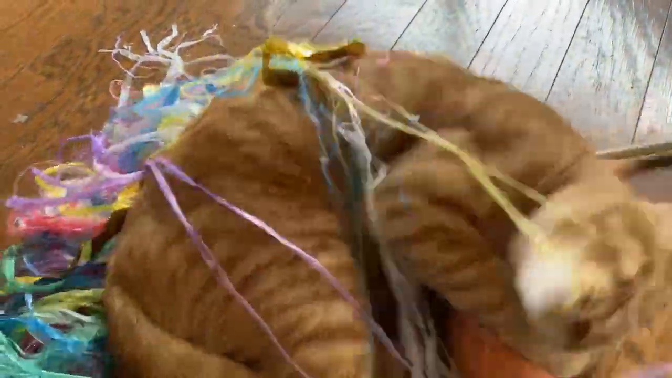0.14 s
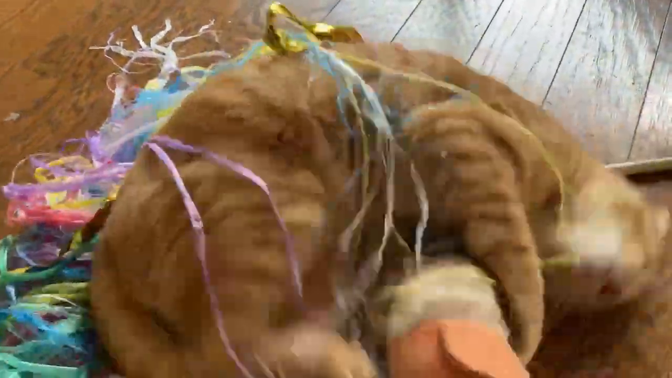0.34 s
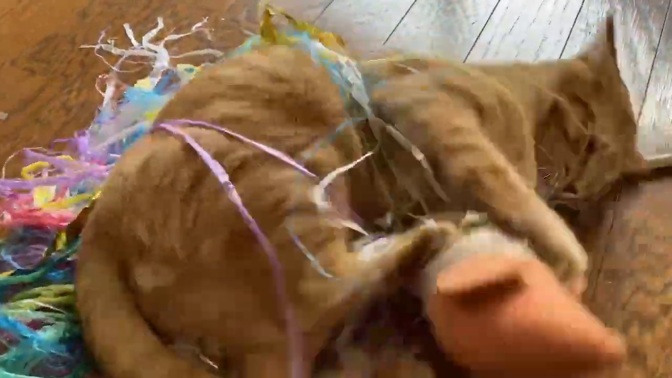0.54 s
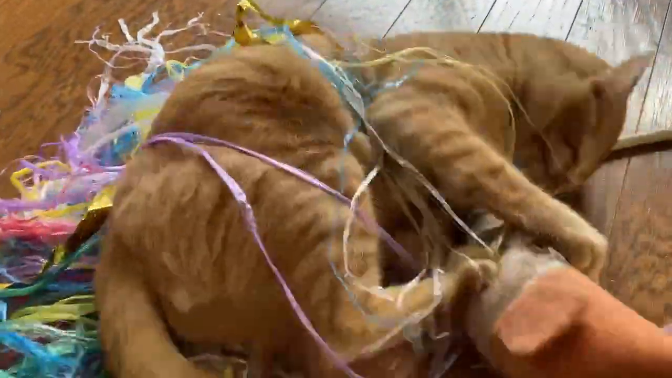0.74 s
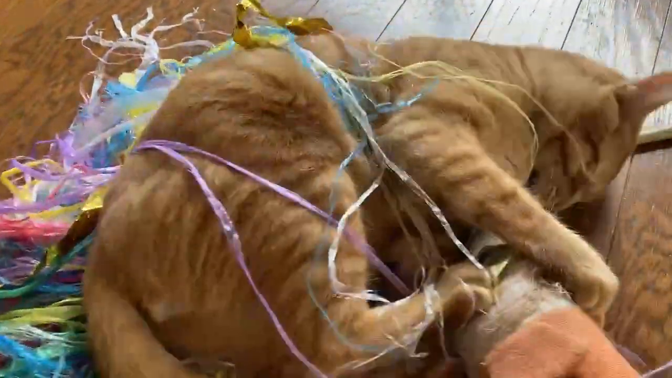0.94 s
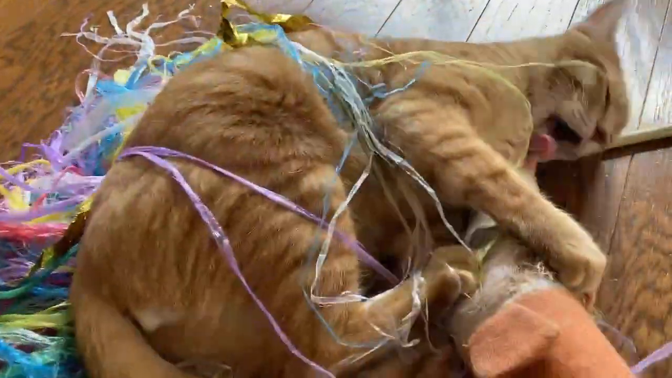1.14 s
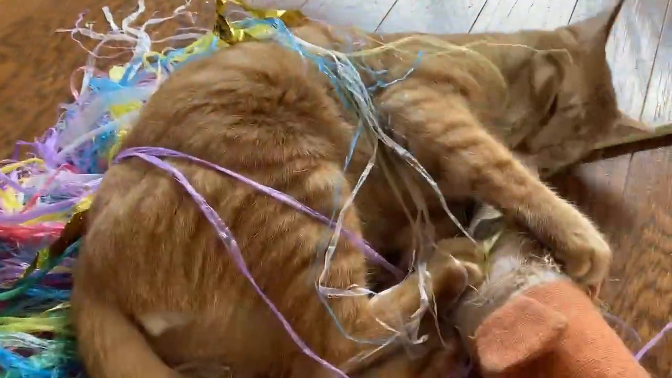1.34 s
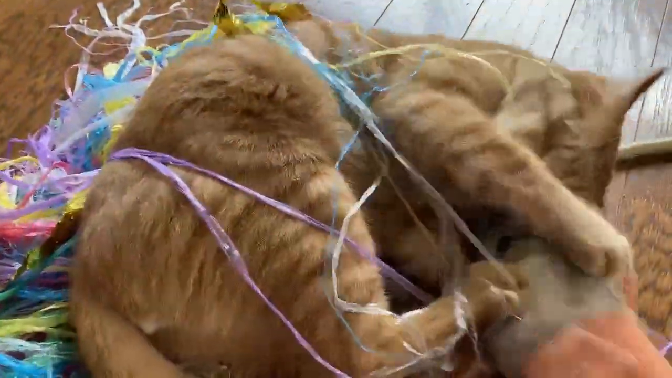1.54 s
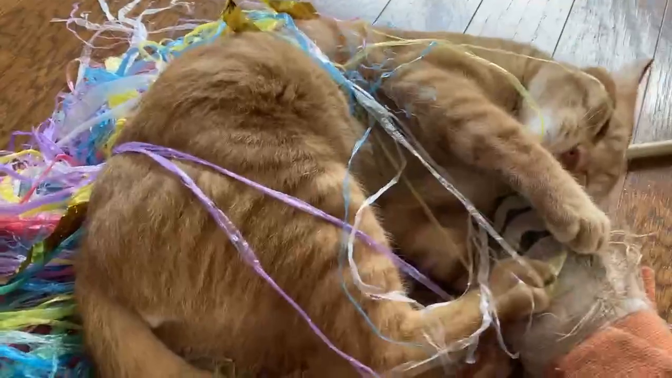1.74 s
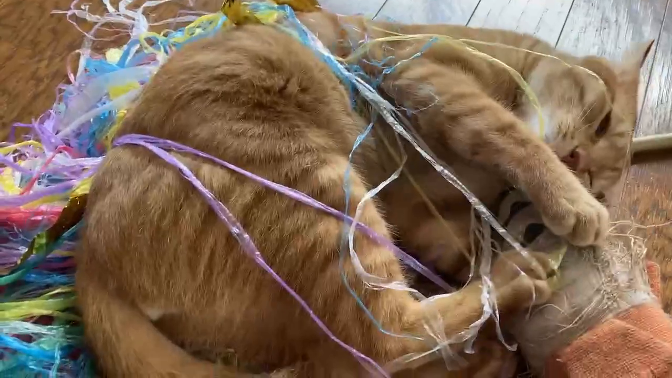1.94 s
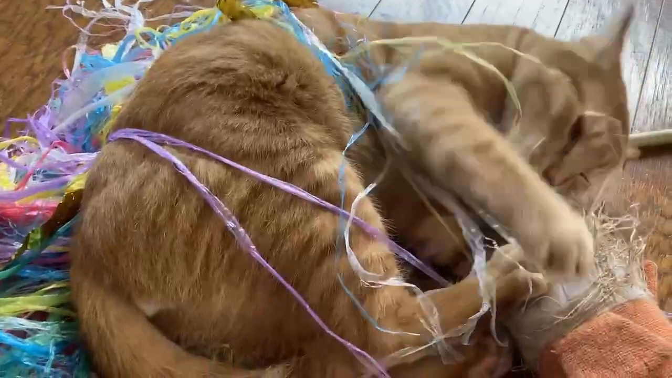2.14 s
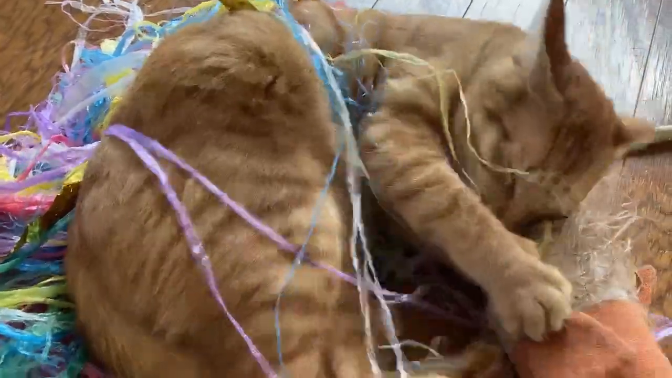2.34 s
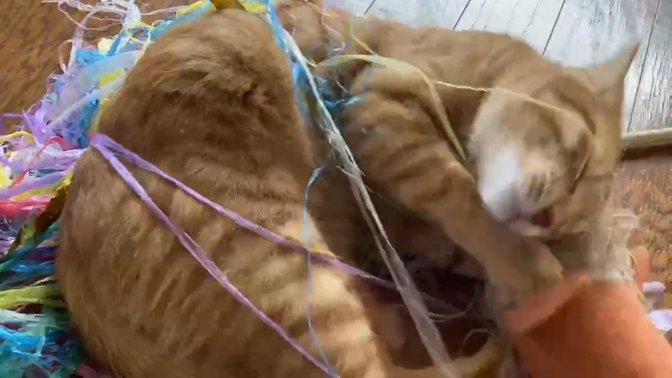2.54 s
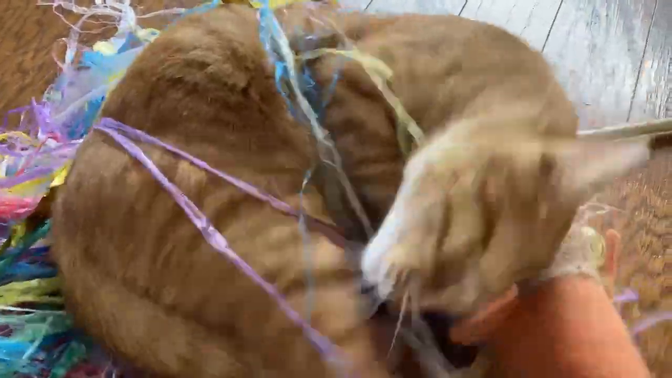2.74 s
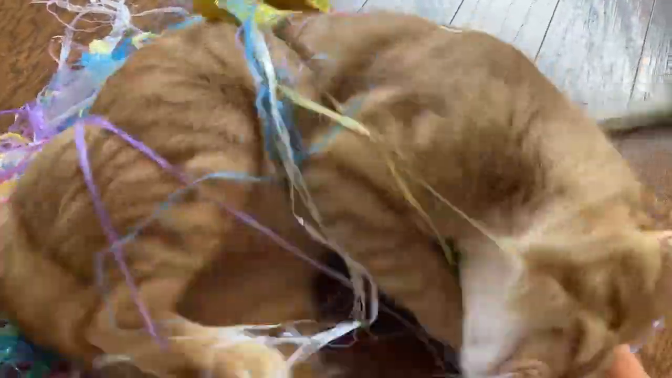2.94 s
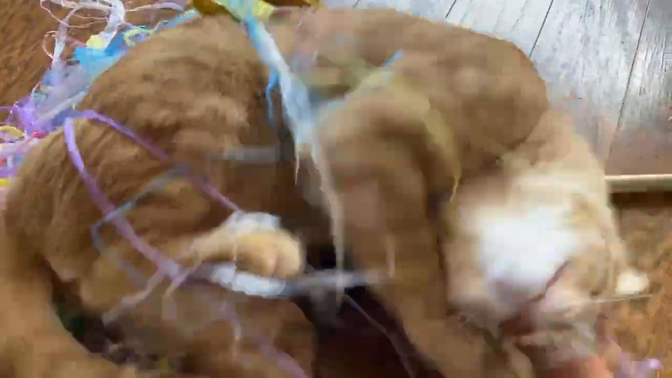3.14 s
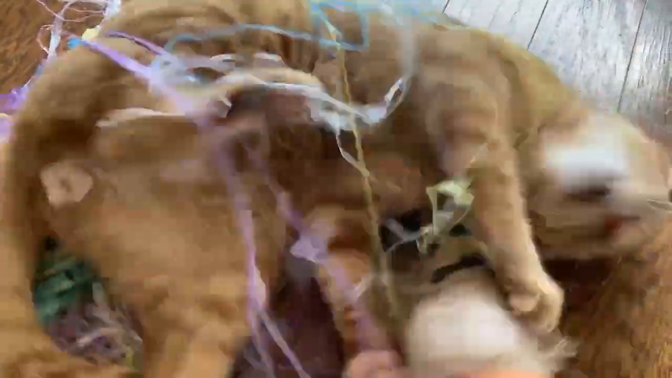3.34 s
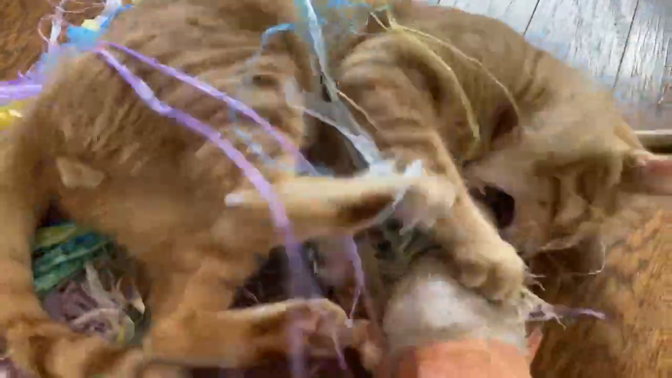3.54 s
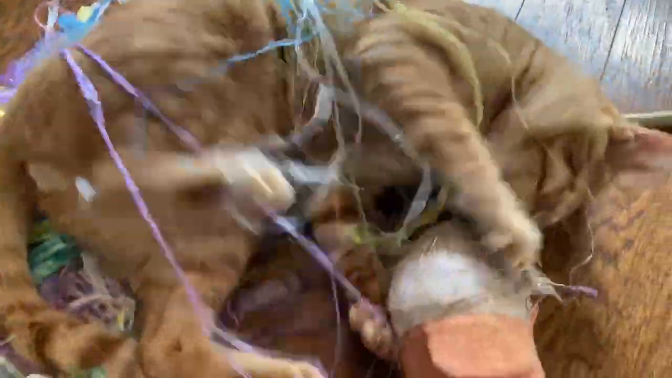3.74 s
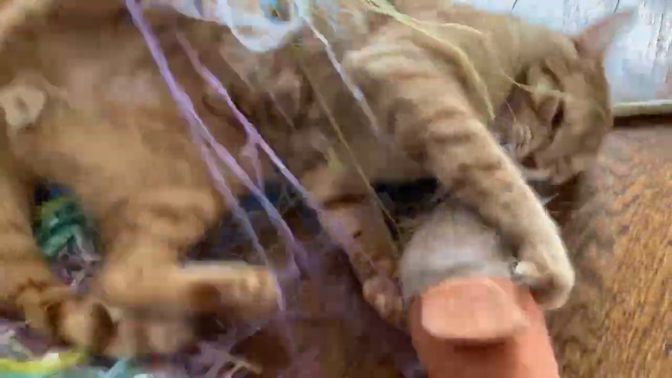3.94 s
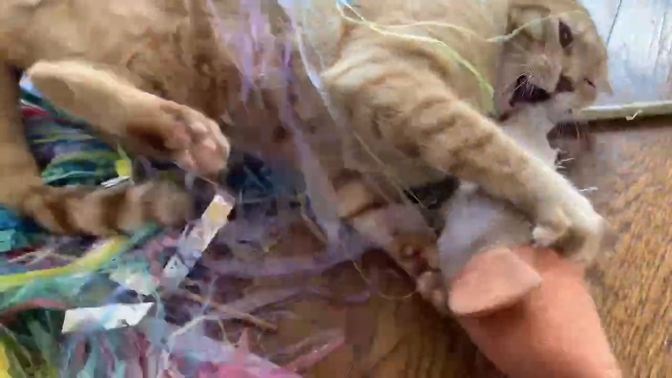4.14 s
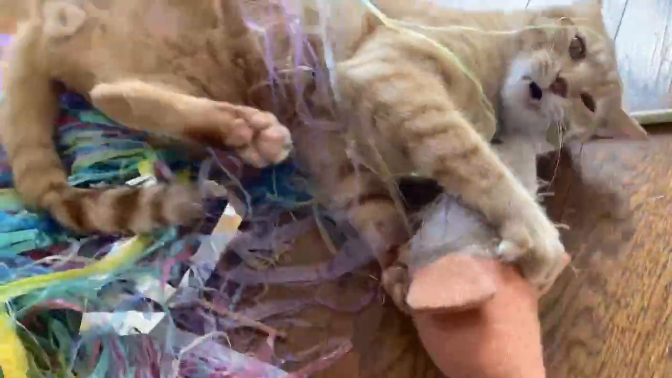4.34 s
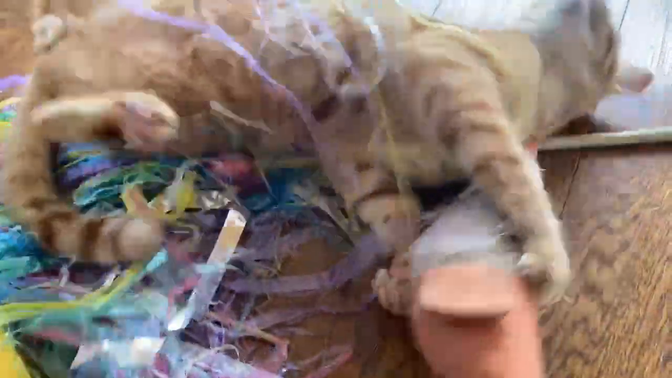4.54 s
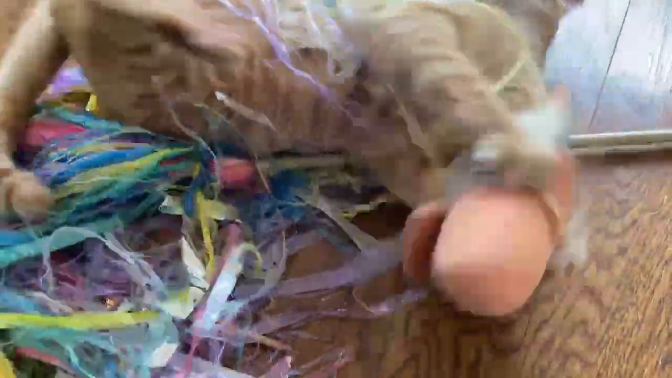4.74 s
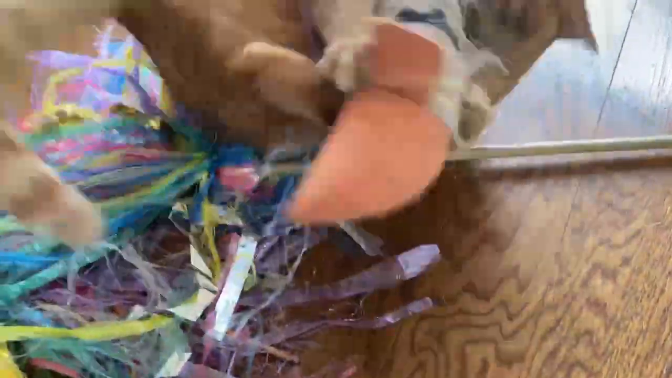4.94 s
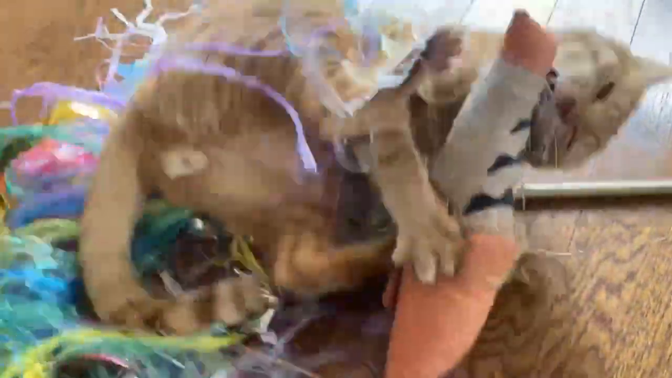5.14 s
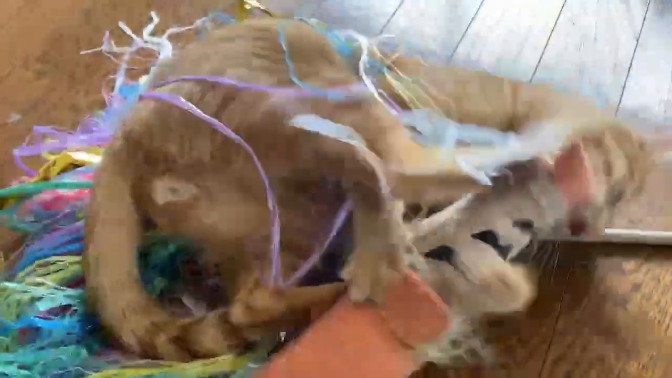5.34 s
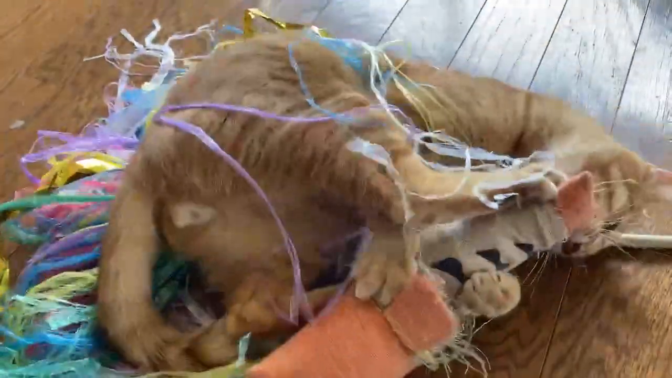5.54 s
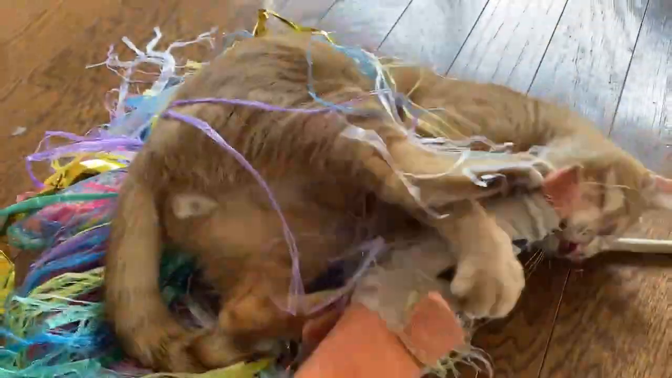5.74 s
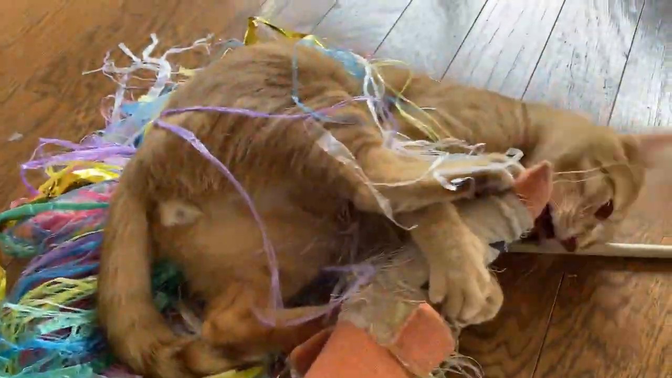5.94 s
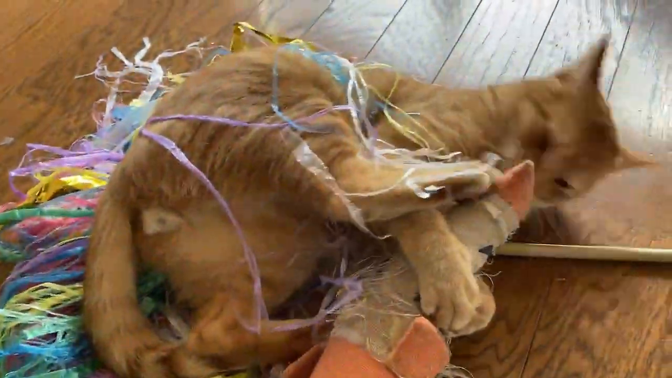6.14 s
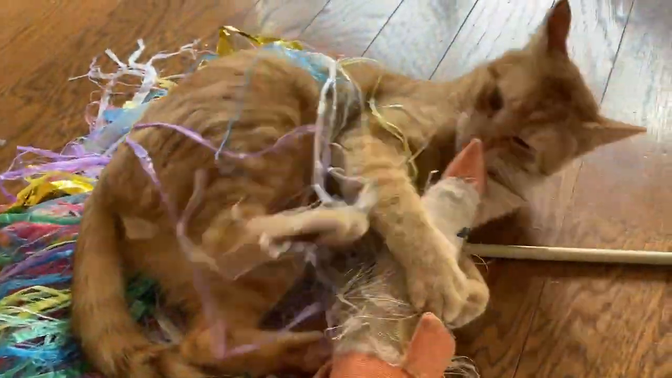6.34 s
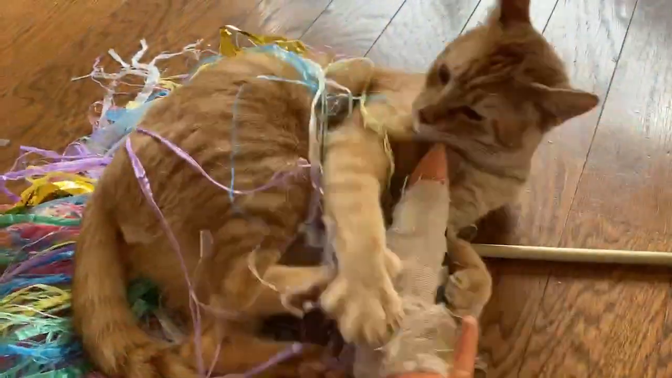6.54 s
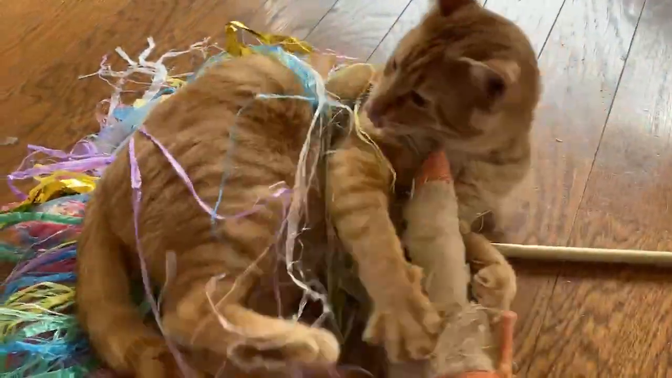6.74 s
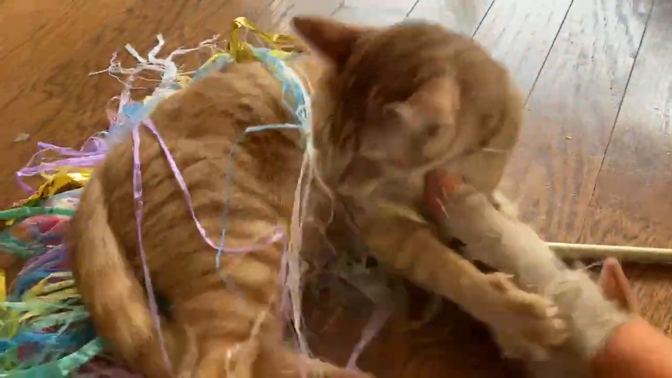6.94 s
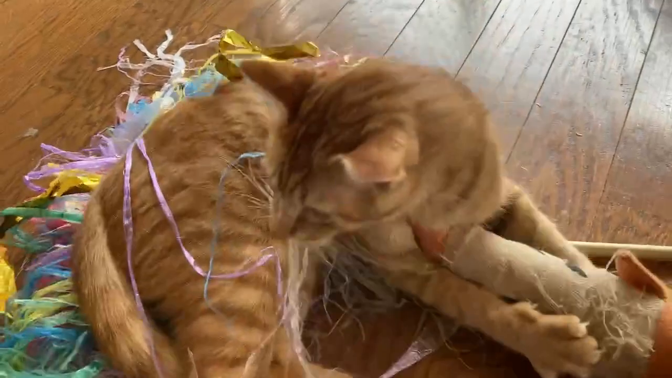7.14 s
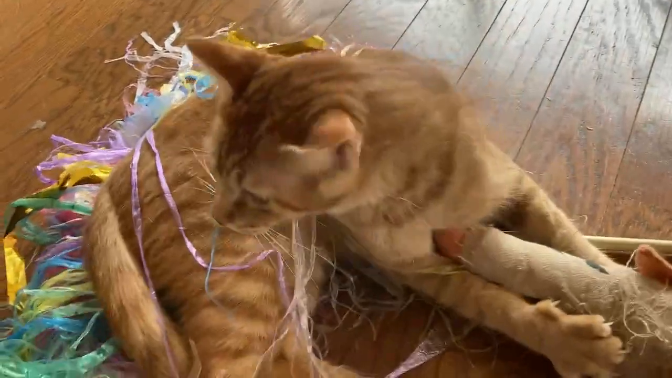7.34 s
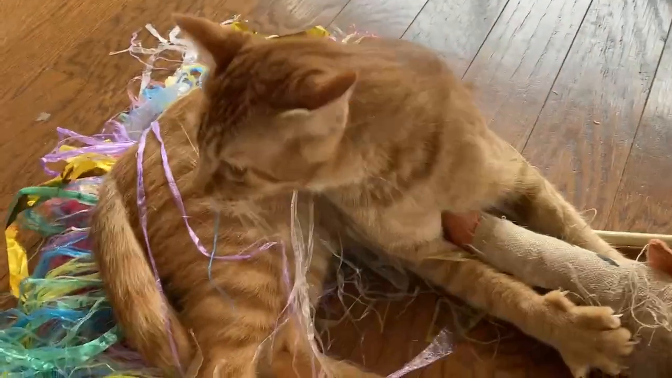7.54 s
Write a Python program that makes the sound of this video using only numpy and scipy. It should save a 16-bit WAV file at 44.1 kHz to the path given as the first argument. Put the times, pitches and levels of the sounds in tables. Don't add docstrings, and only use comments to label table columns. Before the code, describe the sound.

A cat wrestles a cloth toy in loose ribbon: crisp bright rustling, crackling flurries, faint collar jingle, claws and a stick tapping bare boards.

```python
import sys
import numpy as np
from scipy import signal
from scipy.fft import rfft, irfft
from scipy.io import wavfile
from scipy.ndimage import uniform_filter1d

SR = 44100
rng = np.random.default_rng(int(sys.argv[2]) if len(sys.argv) > 2 else 0)


def natural_amplitude(level_db):
    exponent = np.asarray(level_db, float) / 20
    return 10 ** exponent


def store_pcm(level_fs):
    pcm = np.round(np.clip(level_fs, -1, 1) * 32767).astype(np.int16)
    wavfile.write(sys.argv[1], SR, np.atleast_2d(pcm).T)


N = 338688
T = np.arange(N) / SR
HZ = np.fft.rfftfreq(N, 1 / SR)

# fullest moment in seconds, level in dB, rise and fall over 20 dB in seconds.
STIRS = [(.09, -48, 0.26, 0.18), (.235, -36.5, 0.14, 0.092), (.33, -44.5, 0.085, 0.18),
         (.445, -46.5, 0.088, 0.35), (.66, -47, 0.31, 0.36), (1.15, -61, 1.9, 1), (1.48, -54.5, 0.13, 0.36),
         (1.6, -54.5, 0.43, 0.28), (1.72, -64, 0.45, 0.3), (2.05, -61, 0.14, 0.055),
         (2.25, -48.5, 0.077, 0.35), (2.5, -43, 0.087, 0.3), (2.85, -48, 0.3, 0.36),
         (2.975, -42, 0.22, 0.26), (3.175, -42.5, 0.11, 0.31), (3.385, -42.5, 0.29, 0.19),
         (3.72, -53.5, 1.3, 0.46), (4.05, -42.5, 0.49, 0.42), (4.4, -60.5, 1, 1), (4.68, -46, 0.66, 0.33),
         (4.95, -43, 0.28, 0.17), (5.085, -36, 0.065, 0.14), (5.33, -38.5, 0.32, 0.16), (5.6, -54, 0.32, 1),
         (5.8, -59, 0.18, 0.093), (6.19, -49, 0.075, 0.13), (6.57, -57.5, 0.4, 0.96),
         (6.98, -52.5, 0.33, 0.76), (7.12, -52, 0.56, 0.14), (7.42, -60, 0.12, 0.23)]
# fullest moment in seconds, scrape in dB, rumble in dB, length within 20 dB in seconds.
SHOVES = [(0.056, -51.5, -61, 0.15), (0.22, -48, -63, 0.22), (0.312, -83, -67.5, 0.5),
          (0.442, -61, -55, 0.02), (1.092, -62.5, -66.5, 0.56), (1.255, -60, -65, 0.5),
          (1.404, -60.5, -67, .5), (1.535, -58, -58.5, 0.3), (1.856, -60.5, -74, 0.17),
          (2.052, -59.5, -62, 0.25), (2.248, -52.5, -62, 0.2), (2.554, -55.5, -62, 0.48),
          (2.638, -47.5, -57, 0.16), (2.858, -48, -59.5, 0.13), (3.011, -45, -67, 0.2),
          (3.124, -74, -64.5, 0.3), (3.325, -82, -70, 1), (3.482, -54.5, -57.5, 0.17),
          (4.06, -53, -66, 0.44), (4.582, -58.5, -79, 0.3), (4.728, -58.5, -64.5, 0.22),
          (4.919, -50, -62.5, 0.24), (5.005, -67, -39, 0.0268), (5.122, -60, -59, 0),
          (5.381, -56, -64.5, 0.19), (6.204, -57, -75, 0.18), (6.592, -64, -74, 1.65),
          (6.898, -57.5, -65, 0.4), (7.207, -59.5, -69.5, 0.5), (7.531, -53.5, -63.5, 0.4)]
# low and high edge in Hz, place between controls (0 rumble, 1 scrape,
# 2 low hiss, 3 top hiss), level in dB, share of cracks (0-1), share unlike between channels (0-1).
RUSTLE_BANDS = [(29.8, 90, 0., -3.5, 0.031, 0.0017), (92.7, 188.8, 0., -1.5, 0.11, 0.00055),
                (200.7, 406, 0.52, -6, 0.22, 0.00087), (414, 1064, 1.3927, -5, 0.39, 0.0032),
                (1055, 2240, 1.5, -3, 0.32, 0.4), (2214, 2860, 1.27, -6, 0.25, 0.41),
                (2870, 4090, 1.75, -3, 0.29, 0.48), (4030, 6330, 2, -0.5, 0.29, 0.55),
                (6380, 7930, 2., -0.8, 0.61, 0.026), (8097, 10390, 3., -2, 0.28, 0.0036),
                (10500, 12800, 3., -4, 0.43, 0.015), (12900, 15600, 3., -6.5, 0.23, 0.025)]
# start in seconds, peak in dB, ring in Hz, body below 8 kHz in dB.
SNAPS = [(.1796, -15, 8850, 0), (.235, -16, 10800, -8), (.261, -16.5, 9600, -6), (.6881, -29, 12600, -3),
         (1.122, -30, 10100, -2.5), (2.2325, -17.5, 8500, -0.5), (2.2414, -15.5, 8900, 1),
         (2.4295, -17, 8000, 2.2), (2.4513, -29, 8000, 1.5), (2.4724, -23.5, 9900, -0.5),
         (2.5273, -19, 8900, -1), (2.5343, -14.5, 10900, -5), (2.5451, -21.5, 10100, 1),
         (2.6216, -20, 7000, -2.3), (3.0342, -19, 10200, -10), (3.1887, -17, 9000, -7),
         (3.2216, -16, 11000, -3), (3.2335, -18, 9000, -4), (3.366, -15, 10900, 0),
         (4.4488, -20.5, 10500, -1.5), (4.7826, -22, 10000, -2), (4.8417, -22, 10500, 2.5),
         (4.9373, -17.5, 10300, -5.5), (5.0187, -22.5, 12300, -1), (5.0561, -20, 12200, -8),
         (5.2284, -18.5, 9400, -8.5), (5.2635, -15, 10100, 2.5), (5.695, -26, 14200, -7),
         (6.83, -28.5, 7900, -3), (7.3102, -31.5, 7500, 0.5)]
# start in seconds, peak in dB.
MORE_SNAPS = [(0.2574, -16), (0.3253, -22), (0.4226, -28), (0.852, -28), (1.0406, -36.5), (1.092, -32),
              (1.5917, -33), (2.237, -22), (2.415, -34), (2.9205, -25), (3.017, -25), (3.1705, -22),
              (3.388, -19), (5.278, -24), (5.34, -20), (5.506, -30.5), (5.601, -32.5), (5.647, -25.5),
              (5.7701, -28.5), (5.8069, -27.5), (5.829, -27), (5.9267, -28), (6.08, -39.5), (6.144, -31.5),
              (7.597, -40), (.72, -31.5), (1.5683, -34.5), (2.484, -30), (2.493, -33), (2.5176, -26),
              (3.1295, -30), (3.1577, -22), (3.181, -27), (3.205, -30), (3.2165, -23), (3.241, -25),
              (3.374, -30), (5.039, -27), (5.089, -25), (6.367, -51), (6.517, -39)]
# start in seconds, low modes in dB,
# second pair of modes against them in dB, top modes in dB.
JINGLES = [(.0094, -46, -1, -59), (.3254, -39.5, -1, -38), (0.423, -48, -2, -38), (0.4475, -45, -2, -39),
           (.458, -41.5, 0, -47), (0.613, -45, -1, -51), (0.6875, -36.5, 0, -38), (1.69, -55.5, 1, -65),
           (1.7725, -56.5, -8, -60), (1.79, -52, -1, -60), (2.38, -44, -8, -67),
           (2.6507, -43.5, -14, -85.5), (3.3394, -54, -1, -43), (3.403, -31, -4, -38.5),
           (3.453, -31.5, -4, -46), (3.487, -41.5, -8, -58), (3.6443, -49, -2, -42.5),
           (4.7249, -35, -17, -59), (4.7472, -37.5, -1.5, -61), (4.7584, -34, -6, -57),
           (4.782, -39.5, -11, -59.5), (4.826, -36, -11, -58), (4.889, -39, -10, -64),
           (4.912, -43, -3, -62), (4.9488, -39, -11, -47), (4.974, -37, -3, -48), (4.982, -32, -10, -50),
           (4.993, -32, -2, -41), (6.701, -55.5, -7, -64), (6.984, -50.5, -4, -57), (6.998, -44, -3.5, -61),
           (7.062, -38, -3.5, -58), (7.075, -38, -12, -64), (6.785, -55.5, -15, -67),
           (7.262, -58, -14, -71)]
# pitch in Hz, level in dB, 60 dB decay in seconds.
BELL_MODES = [(5070, -4, 0.049), (5300, 1.5, 0.14), (5920, 8, 0.072), (6400, -14, 0.026),
              (12600, 1.5, 0.058), (13450, -6, 0.037)]
# start in seconds, peak in dB, ring in Hz.
KNOCKS = [(.423, -42.5, 600), (0.62, -45, 2890), (.869, -47.5, 646), (.935, -49, 587), (1.22, -41.5, 2980),
          (1.442, -38.5, 520), (1.536, -39, 955), (2.297, -43, 4580), (2.666, -34, 848), (2.774, -41, 534),
          (3.451, -32, 887), (3.656, -60.5, 1340), (4.0088, -38, 1190), (4.055, -24, 1603),
          (4.061, -23.5, 792), (4.073, -31.5, 710), (4.159, -47, 1170), (4.617, -42, 2700),
          (4.653, -41.5, 2160), (4.796, -42.5, 1220), (4.8625, -27.5, 1680), (4.873, -34.5, 1510),
          (4.948, -30, 3720), (5.624, -55.5, 1055), (5.765, -49.5, 680), (6.175, -37, 1805),
          (6.225, -41.5, 2470), (6.539, -45, 790), (6.608, -48.5, 1410), (6.856, -46, 2320),
          (6.926, -44, 1845)]
# start in seconds, peak in dB, ring in Hz.
THUMPS = [
    (1.046, -55, 306),
    (2.041, -54.5, 294),
    (3.306, -52, 127),
    (3.321, -56, 83.4),
    (4.997, -42, 118),
    (5.096, -53, 90),
]
# start in seconds, peak in dB, ring in Hz.
CLAWS = [(0.62, -46, 2860), (0.905, -49, 2400), (0.9516, -46, 3575), (0.9911, -46, 4550),
         (1.0251, -45, 6810), (1.066, -46.5, 4340), (1.1004, -36.5, 4440), (1.2221, -35.5, 2900),
         (1.4416, -35, 2430), (1.5559, -34, 1580), (1.6886, -50, 5030), (1.937, -51, 4160),
         (1.9989, -54, 7040), (2.1789, -48, 7090), (2.7292, -46, 4030), (2.813, -41, 4440),
         (2.8394, -42, 2050), (3.839, -40, 7290), (4.0089, -23, 2880), (4.0542, -22, 1940),
         (4.545, -34, 6020), (4.574, -36, 7050), (4.5885, -30.5, 6000), (4.6533, -32, 7040),
         (4.7596, -26, 5310), (4.8623, -30, 1740), (4.9038, -32, 6720), (5.3457, -52, 2270),
         (5.3592, -42, 1770), (5.9998, -56, 7220), (6.148, -39.5, 4500), (6.1514, -32.5, 4390),
         (6.1664, -39, 6840), (6.1764, -40.5, 1770), (6.2242, -39, 2440), (6.6074, -53, 2160),
         (6.9269, -35.5, 2150), (7.0254, -36, 6960)]
# fullest moment in seconds,
# length within 20 dB in seconds, level in dB, resonance in Hz, its width in Hz.
SCUFFS = [(0.073, 0.04, -48, 1750, 110), (0.062, 0.06, -53, 2360, 110), (2.995, 0.13, -54, 3000, 500),
          (.047, .025, -50, 540, 150), (2.975, .16, -58, 4300, 500), (.098, .04, -54, 1800, 110),
          (2.865, .12, -51, 950, 120), (0.2, .12, -53, 750, 350), (0.247, 0.08, -60, 2400, 900),
          (0.915, 0.2, -63.5, 320, 120), (1.051, .07, -58.5, 338, 151), (1.09, 0.14, -57, 380, 120),
          (1.088, 0.3, -64, 940, 90), (1.49, 0.2, -59, 862, 50), (1.53, .05, -58, 1900, 300),
          (1.537, 0.07, -57, 1000, 120), (1.56, -0.11, -47, 1550, 600), (2.835, .06, -54.5, 1060, 90),
          (2.857, 0.3, -57.5, 1900, 200), (2.878, 0.02, -50.5, 1020, 60), (3.005, .1, -54, 2000, 350),
          (3.01, -0.02, -50, 1750, 200), (3.06, 0.15, -56, 860, 50), (7.528, .15, -65.5, 1300, 500),
          (4.052, 0.09, -42.5, 3000, 1200), (4.764, 0.1, -45.5, 6400, 1500), (5.101, -0.03, -57, 2020, 400),
          (5.122, 0.08, -61.5, 950, 450), (5.134, 0.15, -63, 108, 60), (5.366, 0.01, -47, 1800, 900),
          (5.374, 0.16, -62, 620, 300), (6.88, -0.2, -59, 200, 150), (6.91, -0.02, -57, 640, 200),
          (2.05, 0.1, -58, 290, 200), (7.142, .03, -56, 1100, 500), (7.17, 0.17, -59, 1240, 300),
          (7.222, 0.2, -66.5, 1400, 248)]
# fullest moment in seconds, level in dB, rise and fall over 20 dB in seconds.
DRAGS = [
    (.125, -64, 0.033, 0.06),
    (.706, -68, 0.12, 0.068),
    (1.552, -56, 0.09, 0.042),
    (2.868, -50.5, 0.061, 0.089),
    (3.06, -60, 0.12, 0.12),
]
# pitch in Hz, width in Hz, level in dB.
STICK_MODES = [(885.6, 30, 1), (1003, 16, -7), (1800, 440, -6), (2330, 16, -19)]
# start in seconds, peak in dB, ring in Hz, 60 dB decay in seconds.
TAPS = [(.047, -30.5, 915, .06), (.0715, -32, 905, .055), (.092, -33.5, 885, .045), (.109, -45, 890, .05),
        (.122, -47, 885, .08), (.05, -44, 2330, .06), (.068, -42, 2390, .045), (.196, -41, 1760, .045),
        (.222, -42, 1770, .06), (1.532, -48, 870, .12), (2.866, -46, 1030, .07), (2.902, -42, 880, .04),
        (3.013, -48, 865, .1), (3.041, -47, 865, .12), (3.086, -45, 700, .012), (4.056, -34, 732, .07),
        (4.057, -37, 1935, .04), (6.539, -50, 900, .015), (6.6075, -40, 2200, .008),
        (6.928, -42, 2000, .006)]
# from and to in seconds, depth at start and at end in dB.
DUCKS = [(0, 0.063, -4, 4.4), (0.092, 0.177, 11, 32), (0.188, 0.27, 17, 19.5), (0.274, .32, 27.5, 20),
         (0.32, 0.99, 21, 14.6), (1.594, 1.693, 15, 14.7), (2.698, 2.934, 19.5, 14), (2.936, 3.017, 26, 21),
         (3.02, 3.238, 18, 23.7), (3.256, 3.43, 26.5, 36), (3.529, 3.829, 24.5, 25.8),
         (3.82, 4.149, 7, 13.3), (4.171, 4.448, 16.5, 16.6), (4.446, 4.533, 12, 9.4),
         (5.012, 5.347, 18.5, 35), (5.342, 5.753, 21.5, 25.4), (5.747, 5.986, 13, 14.3),
         (6.255, 6.44, 7, 4.9), (6.434, 6.795, 11, 5.5), (7.026, 7.294, 8, 6.8)]
# pitch in Hz, lead in radians.
PHASE_TURN = [(0, 0), (6400, 0), (7200, 0), (9100, -np.pi), (11300, -2 * np.pi), (13650, -3 * np.pi),
              (15600, -4 * np.pi)]

DUCK_REST_DB, DUCK_EDGE_S = 5, .02
SNAP_DUCK, BELL_DUCK = 1.09, .79
REST_RIBBON_DB, REST_SCRAPE_DB, REST_RUMBLE_DB = -82.5, -76.5, -75.5
SHOVE_RISE_SHARE, SCUFF_RISE_SHARE = .49, .34
MORE_SNAP_HZ, MORE_SNAP_BODY_DB = 10800, -2.5
KNOCK_T60_S, KNOCK_LAG_S = .022, .00004
CLAW_Q, CLAW_TAIL, CLAW_TAIL_S = 1.2, .1, .0015
TAP_RISE_S = .006
HUM_HZ, HUM_DB = 118.6, -75
ROOM_T60_S, ROOM_DB = .2, -18
BELL_TURN_RAD = 1.99
SETTLE_RAD, SETTLE_SWING_RAD, NOTCH_DRIFT = .92, .28, .005
PATCH_LOW_DB, PATCH_TOP_DB = 3, 2


def rustle():
    lead = controls()
    cracks = grains(1800, 6.7)
    bunching = 1.83 * walk(45)
    alike, unlike = 0, 0
    for lo, hi, place, db, grain, loose in RUSTLE_BANDS:
        k = int(place)
        grain, loose = np.clip(grain, 0, 1), np.clip(loose, 0, 1)
        lead_db = lead[k] + (place - k) * (lead[k + 1] - lead[k])
        gain = natural_amplitude(lead_db + db + grain * 2 * bunching + 1.42 * walk(25))
        crackle = unit(band(cracks * natural_amplitude(2.7 * rng.standard_normal(N)), lo, hi))
        hiss, other_hiss = (unit(band(rng.standard_normal(N), lo, hi)) for _ in range(2))
        blend = np.sqrt(grain) * crackle + np.sqrt(1 - grain) * hiss
        alike = alike + gain * blend * np.sqrt(1 - loose)
        unlike = unlike + gain * np.sqrt(loose) * other_hiss
    return alike, unlike


def controls():
    s, scrape_db, rumble_db, length = np.transpose(SHOVES)
    rise, fall = SHOVE_RISE_SHARE * length, (1 - SHOVE_RISE_SHARE) * length
    rumble = swells(zip(s, rumble_db, 1.23 * rise, 1.2 * fall), REST_RUMBLE_DB)
    rumble = rumble + 1.5 - .14 * ducking(T)
    scrape = swells(zip(s, scrape_db, rise, fall), REST_SCRAPE_DB)
    top = swells(STIRS, REST_RIBBON_DB)
    return rumble, scrape, top - ducking(T), top, top


def snaps():
    top, low = np.zeros(N), np.zeros(N)
    creases = list(SNAPS) + [(s, db, MORE_SNAP_HZ, MORE_SNAP_BODY_DB) for s, db in MORE_SNAPS]
    fizz = rng.standard_normal((len(creases), 400))
    fizz = fizz * abs(fizz) * np.exp(-T[:400] / .0021)
    for (s, db, hz, body_db), tail in zip(creases, fizz):
        crack = .12 * tail
        crack[:40] *= np.linspace(.2, 1.2, num=40)
        crack[40] += 1
        strip = signal.lfilter(*signal.iirpeak(hz, 2.2, fs=SR), crack)
        add(top, s - 40 / SR, natural_amplitude(db + 10) * (strip + .22 * crack))
        add(low, s - 40 / SR, natural_amplitude(db + body_db - SNAP_DUCK * ducking(s) + 14.5) * crack)
    low = signal.lfilter(*signal.butter(2, 4600, "high", fs=SR), low) + .07 * low
    air = natural_amplitude(-43) * band(top, 16300, 17300)
    return band(top, 8060, 15600) + air + band(low, 330, 10300)


def bell():
    out = np.zeros(N)
    chance = rng.standard_normal((len(JINGLES), len(BELL_MODES)))
    t = T[:int(.2 * SR)]
    contact = np.minimum(t / .0004, 1)
    for (s, db, pair_db, top_db), detune in zip(JINGLES, chance):
        db = db - BELL_DUCK * ducking(s + t)
        blow = (db, db, db + pair_db, db + pair_db, top_db, top_db)
        for (hz, mode_db, t60), level, r in zip(BELL_MODES, blow, detune):
            tone = ring(hz * (1 + .0026 * r), t60, .2)
            add(out, s, natural_amplitude(level + mode_db + 3.5) * contact * tone)
    out *= natural_amplitude(2.6 * walk(180) + 4 * walk(700) - 2.5)
    return band(out, 4000, 15600)


def boards():
    out = np.zeros(N)
    t = T[:4000]
    rattle = rng.standard_normal((len(KNOCKS), len(t)))
    for (s, db, hz), noise in zip(KNOCKS, rattle):
        chirp = np.sin(2 * np.pi * hz * (.6 * t + .0028 * (1 - np.exp(-t / .0022))))
        chirp = chirp * np.exp(-t / .0035) * np.minimum(t / .0006, 1)
        edges = [.5 * hz, min(3.02 * hz, 4400)]
        wood = signal.lfilter(*signal.butter(3, edges, "band", fs=SR), noise)
        wood = wood * np.exp(-np.log(1000) * t / KNOCK_T60_S)
        add(out, s, natural_amplitude(db) * (.69 * chirp + 1.48 * wood))
    for s, db, hz in THUMPS:
        sag = np.sin(2 * np.pi * hz * (.72 * t + .0065 * (1 - np.exp(-t / .0048))))
        push = np.sin(np.pi * np.minimum(t / .026, 1))
        add(out, s, natural_amplitude(db + 4.5) * sag * push)
    return out


def claws():
    out = np.zeros(N)
    fizz = rng.standard_normal((len(CLAWS), 600)) * np.exp(-T[:600] / CLAW_TAIL_S)
    for (s, db, hz), tail in zip(CLAWS, fizz):
        tick = CLAW_TAIL * tail
        tick[20] += 1
        tick = signal.lfilter(*signal.iirpeak(hz, CLAW_Q, fs=SR), tick)
        add(out, s, natural_amplitude(db + 1) * tick / abs(tick).max())
    return band(out, 970, 8000)


def scuffs():
    out = np.zeros(N)
    lead_in = .08
    t = T[:12000] - lead_in
    chance = rng.standard_normal((len(SCUFFS), 2, len(t)))
    for (s, length, db, hz, width), (hiss, slips) in zip(SCUFFS, chance):
        rub = hiss + np.clip(slips, -3, 3) ** 5 * (abs(slips) > 2.3) / 20
        peak = signal.iirpeak(hz, hz / (1.5 * width), fs=SR)
        tone = unit(signal.lfilter(*peak, signal.lfilter(*peak, rub)))
        fade = np.where(t < 0, -t / SCUFF_RISE_SHARE, t / (1 - SCUFF_RISE_SHARE)) / max(length, .005)
        skip = max(int((lead_in - s) * SR), 0)
        add(out, s - lead_in, (tone * natural_amplitude(db - 20 * fade))[skip:])
    return out


def stick():
    slips = unit(grains(1500, 5.6)) + .5 * rng.standard_normal(N)
    body = np.zeros(N)
    for hz, width, db in STICK_MODES:
        body += natural_amplitude(db) * unit(signal.lfilter(*signal.iirpeak(hz, hz / width, fs=SR), slips))
    gain = uniform_filter1d(natural_amplitude(swells(DRAGS, -120)), size=400)
    return body * gain * natural_amplitude(3.05 * walk(70) - 1.5)


def taps():
    out = np.zeros(N)
    t = T[:int(.2 * SR)]
    for s, db, hz, t60 in TAPS:
        contact = np.minimum(t / min(TAP_RISE_S, t60 / 12), 1)
        add(out, s, natural_amplitude(db) * ring(hz, t60, .2) * contact)
    return out


def hum():
    level = natural_amplitude(HUM_DB + 5 - .55 * ducking(T) + 1.8 * walk(6.8))
    drift = 1.7 * np.cumsum(walk(20)) * 20 / SR
    return level * np.sin(2 * np.pi * HUM_HZ * T + drift)


def room(x):
    t = T[:int(.35 * SR)]
    tails = rng.standard_normal((2, len(t))) * np.exp(-np.log(1000) * t / ROOM_T60_S) * (t > .004)
    tails /= np.sqrt(np.sum(tails ** 2, axis=1, keepdims=True))
    return natural_amplitude(ROOM_DB) * signal.fftconvolve(x[None], tails, axes=1)[:, :N]


def ducking(t):
    spells = [np.interp(t, [a - DUCK_EDGE_S, a, b, b + DUCK_EDGE_S], [0, d0, d1, 0])
              for a, b, d0, d1 in DUCKS]
    return np.maximum(np.max(spells, axis=0), DUCK_REST_DB)


def widen(x, radians):
    return np.array([irfft(rfft(x) * np.exp(side * .5j * radians), N) for side in (1, -1)])


def wander(x):
    hz, t, z = signal.stft(x, SR, nperseg=1024)
    shift, swing = (unit(uniform_filter1d(rng.standard_normal(len(t)), size=7)) for _ in range(2))
    turn = np.interp(hz[:, None] * (1 + NOTCH_DRIFT * shift), *np.transpose(PHASE_TURN))
    turn = settled(turn, np.clip(SETTLE_RAD + SETTLE_SWING_RAD * swing, .45, 1.2))
    return signal.istft(z * np.exp(.5j * np.array([turn, -turn])), SR, nperseg=1024)[1][:, :N]


def settled(radians, reach):
    nearest = np.round(radians / np.pi) * np.pi
    off = radians - nearest
    return nearest + np.sign(off) * np.maximum(abs(off) - reach, 0) * np.pi / (np.pi - 2 * reach)


def patchy(x):
    mid_side = np.array([x[0] + x[1], x[0] - x[1]]) / 2
    hz, t, z = signal.stft(mid_side, SR, nperseg=1024)
    fine, coarse = rng.standard_normal((2, *z.shape))
    fine = unit(uniform_filter1d(uniform_filter1d(fine[0], size=4, axis=0), size=2, axis=1))
    coarse = unit(uniform_filter1d(uniform_filter1d(coarse, size=9, axis=1), size=8, axis=2))
    depth_db = np.where(hz < 7950, PATCH_LOW_DB * np.minimum(hz / 2000, 1), PATCH_TOP_DB)[:, None]
    gain = natural_amplitude(depth_db * fine - depth_db ** 2 * np.log(10) / 20)
    ducked = np.clip((ducking(t) - 8) / 22, 0, 1)
    exposed = np.interp(hz, [2300, 3300, 4400, 5500, 6400, 7900, 8000, 12000, 13500],
                        [0, 1.2, .7, 1.05, .7, 1.1, 0, 0, .33])[:, None]
    kept = coarse > -2.6 + exposed * (1.7 + 1.8 * ducked + 2.5 * (hz[:, None] > 8000))
    mid, side = signal.istft(z * gain * kept, SR, nperseg=1024)[1][:, :N]
    return np.array([mid + side, mid - side])


def swells(rows, rest_db):
    t = T[::100]
    power = natural_amplitude(rest_db) ** 2
    for s, db, rise, fall in rows:
        away = np.where(t < s, (s - t) / max(rise, .005), (t - s) / max(fall, .005))
        power = power + natural_amplitude(db - 20 * away) ** 2
    return np.interp(T, t, 10 * np.log10(power))


def walk(rate):
    k = int(SR / rate)
    return 1.254 * uniform_filter1d(np.repeat(rng.standard_normal(N // k + 1), k), k)[:N]


def grains(rate, spread_db):
    size = natural_amplitude(spread_db * np.minimum(rng.exponential(size=N), 2.9)) * rng.choice([-1, 1], N)
    return size * (rng.random(N) < rate / SR)


def ring(hz, t60, seconds):
    t = T[:int(seconds * SR)]
    return np.sin(2 * np.pi * hz * t) * np.exp(-np.log(1000) * t / t60)


def unit(x):
    return x / np.sqrt(np.mean(x ** 2))


def band(x, lo_hz, hi_hz):
    above = np.clip((HZ / lo_hz - 1) / .03 + .5, 0, 1)
    below = np.clip((1 - HZ / hi_hz) / .03 + .5, 0, 1)
    return irfft(rfft(x) * np.sqrt(above * below), N)


def add(out, s, x):
    i = max(int(s * SR), 0)
    out[i:i + len(x)] += x[:N - i]


def scene():
    alike, unlike = rustle()
    knocks, jingle = boards() + stick(), bell()
    turn = np.interp(HZ, *np.transpose(PHASE_TURN))
    struck = widen(snaps(), turn)
    struck += widen(knocks + scuffs() + taps() + claws(), 2 * np.pi * HZ * KNOCK_LAG_S)
    struck += widen(jingle, turn + BELL_TURN_RAD * (HZ < 7000))
    steady = wander(alike + hum()) + unlike * np.array([[1], [-1]])
    return struck + patchy(steady + room(band(knocks + jingle, 870, 6500)))


def band_limit(x):
    return signal.sosfilt(signal.butter(12, 16980, fs=SR, output="sos"), x)


def record(dry):
    mix = signal.sosfilt(signal.butter(3, 55, "high", fs=SR, output="sos"), dry)
    return band_limit(mix)


dry = scene()
out = record(dry)
store_pcm(out)
```